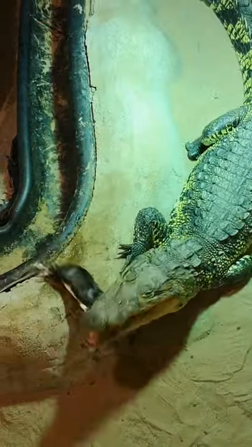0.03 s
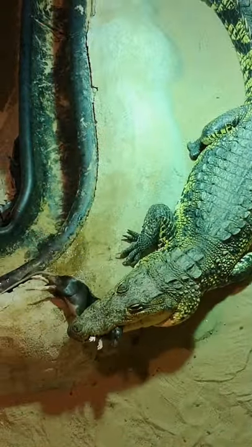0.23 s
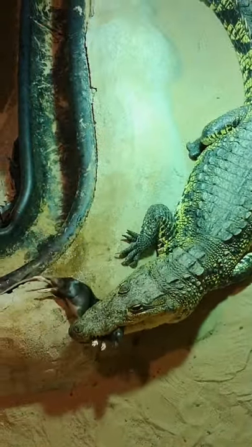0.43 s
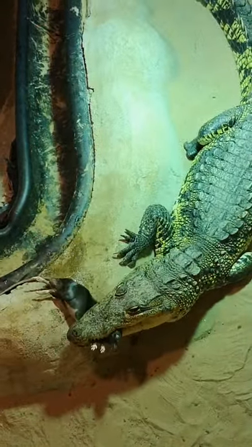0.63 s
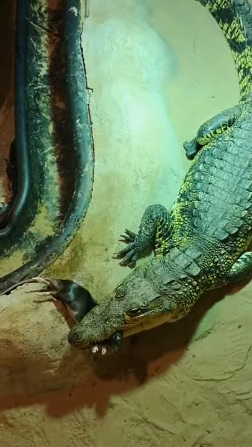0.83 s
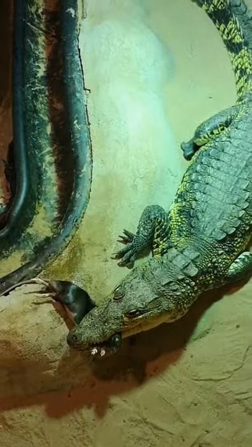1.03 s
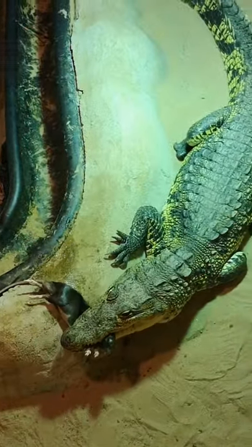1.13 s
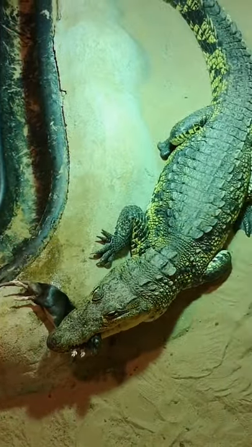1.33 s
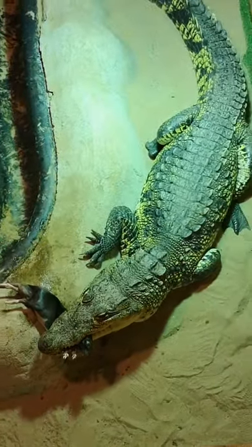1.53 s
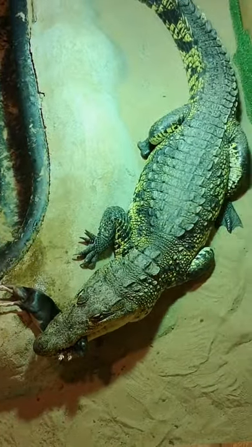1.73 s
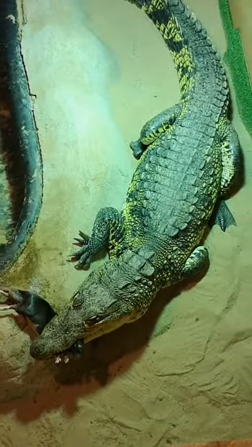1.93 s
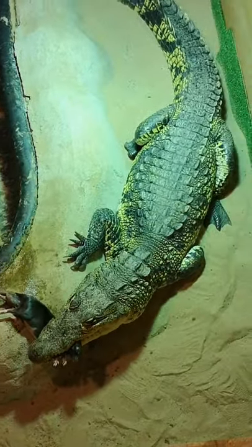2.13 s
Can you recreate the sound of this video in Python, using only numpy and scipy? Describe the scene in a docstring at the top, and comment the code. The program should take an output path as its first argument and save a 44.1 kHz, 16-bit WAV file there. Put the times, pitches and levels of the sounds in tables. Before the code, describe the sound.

A crocodile's jaws snap shut with one bright crunch, followed by two hollow thumps.

```python
"""Crocodile snapping in its enclosure

Stereo microphone, hard walls close by. To the left a crocodile lunges, scuffing sand, and its jaws shut
on a small animal: one bright crunch of grit and bone. Head and body land twice and set the hollow floor
ringing; it settles with faint rustles. Ventilation hisses, rumbles and hums underneath."""
import sys
import numpy as np
from scipy import signal
from scipy.fft import rfft, irfft
from scipy.io import wavfile

SR = 44100
rng = np.random.default_rng(int(sys.argv[2]) if len(sys.argv) > 2 else 0)


def materialize(psi):
    """Save the field psi as 16-bit PCM at rate SR to the path in sys.argv[1].

    A 1-D psi becomes a single channel; in a 2-D psi each row is a channel.
    """
    bounded = np.clip(np.atleast_2d(psi).T, -1, 1)
    quanta = np.round(bounded * 32767).astype(np.int16)
    wavfile.write(sys.argv[1], SR, quanta)


N = 97020
T = np.arange(N) / SR

# Ventilation hiss and rumble spectra: freq_hz, gain_db
HISS_SPECTRUM = [(120, -24), (200, -2.5), (304, -8.5), (462, -8), (554, -15), (1260, -11), (1740, -7.5),
                 (2650, -8), (4100, -17), (5490, -16), (7350, -20.5), (8350, -23.5), (10200, -23),
                 (15500, -26.5)]
RUMBLE_SPECTRUM = [(10, 8), (30, 1.5), (55, 2), (100, 1.5), (150, -9.5), (220, -15), (400, -26),
                   (1000, -87.5)]
# Fan hum: time_s, level_db
HUM_LEVELS = [(0, -75.5), (1.1, -78), (1.4, -71.5), (1.65, -73.5), (1.88, -72.5), (1.95, -60), (2.04, -69),
              (2.15, -63)]
# Decay of the enclosure: freq_hz, t60_s
ROOM_DECAY = [(200, 0.19), (1500, 0.24), (4000, 0.31), (9000, 0.21), (15000, 0.18)]
# Leftward lean at the microphone: freq_hz, left_minus_right_db
LEFT_LEAN = [(100, 4), (400, 1.5), (700, 7), (1290, 6.5), (2380, 1), (4400, 2.5), (6000, 3), (8500, 9.5),
             (10000, 9.5), (11500, 3.5), (15000, 3)]

# Strokes of movement: start_s, rise_s, hold_s, fall_db_per_s, level_db
RUSTLE_STROKES = [(1.02, 0.011, 0.016, 120, -86), (1.345, 0.035, 0.018, 207, -78.5),
                  (1.455, 0.01, 0.011, 229, -78), (1.615, 0.029, .005, 300, -79),
                  (1.80, 0.012, 0.022, 146, -83.5)]  # the animal settling
SCUFF_STROKES = [(-.02, 0.02, .06, 91, -71.5), (.062, 0.019, .035, 120, -59),
                 (.12, 0.019, 0.0047, 154, -54.5)]  # feet and scales on sand
DRAG_STROKES = [(.33, 0.026, 0.015, 61, -71), (.48, 0.017, 0.033, 12.5, -69.5),
                (.532, 0.0027, 0.029, 151, -60.5)]  # belly on sand
LANDING_STROKES = [(.312, 0.0039, 0.0063, 308, -58), (.533, 0.0067, 0.01, 271, -58)]  # sand crushed under each landing
SHOVE_STROKES = [(.305, 0.014, 0.02, 196, -41.5), (.528, 0.004, 0.036, 149, -42)]  # body pushing over the floor
BOOM_STROKES = [(.36, 0.0078, 0.026, 104, -46.5), (.62, 0.043, 0.11, 122, -59),
                (.8, 0.026, 0.12, 105, -60.5)]  # low boom lingering in the enclosure
# Spectra of those strokes, the ticks and the crunch: freq_hz, gain_db
RUSTLE_SPECTRUM = [(1000, -23), (3500, -8), (5500, 9), (7500, 7), (10000, 3.5), (12000, -12),
                   (15000, -25.5)]
SCUFF_SPECTRUM = [(150, 6.5), (400, -2.5), (620, -13), (850, -18), (1050, -7.5), (1300, -10), (1750, -3),
                  (2300, -2.5), (3000, -12.5), (5500, -6), (9200, -10), (12000, -18.5), (15000, -26)]
DRAG_SPECTRUM = [(200, -8), (500, 10), (800, -3), (1100, 1), (1650, 1.5), (2500, -7.5), (4000, -14.5),
                 (8000, -22.5), (15000, -42)]
LANDING_SPECTRUM = [(200, -18), (420, -7), (600, 7), (800, 4.5), (1150, -9.5), (2300, -17), (4000, -33),
                    (12000, -56)]
SHOVE_SPECTRUM = [(20, -6), (45, 2), (100, 7.5), (200, -7), (255, -22), (330, -7), (450, -16), (650, -45),
                  (1000, -53), (3000, -97)]
BOOM_SPECTRUM = [(15, -16), (45, -4), (60, -5.5), (75, 4.5), (88, 3), (110, -22), (200, -64.5)]
TICK_SPECTRUM = [(500, -24), (2500, -24), (3600, 4), (4600, 7), (6000, -5), (9000, -5), (15000, -6.5)]
CRUNCH_SPECTRUM = [(150, -46), (450, -18), (640, -18), (780, -1.5), (1030, 2.5), (1150, -14), (1350, 1.5),
                   (1580, -9), (1800, -2.5), (2450, 2), (3200, -4.5), (3650, -4), (3880, -9), (4700, -3),
                   (7000, -5.5), (9500, -6), (10900, -10.5), (11600, -13.5), (15000, -27)]

# Hide and teeth squeaking: start_s, pitch_hz, length_s, level_db, relative_width
HIDE_SQUEAKS = [(0.085, 1680, 0.02, -61.5, 0.094), (0.2132, 2450, 0.0058, -42, 0.078),
                (0.252, 1040, 0.034, -51.5, 0.035), (0.275, 1010, 0.018, -51.5, 0.047),
                (0.304, 1870, 0.0103, -50.5, 0.11), (.622, 1470, 0.019, -63.5, 0.086),
                (.68, 1200, 0.036, -70.5, 0.036), (1.13, 2460, .025, -78, .15),
                (1.335, 1950, 0.031, -75.5, .1)]
# Blows on the floor, harder with a higher corner: start_s, level_db, corner_hz
FLOOR_BLOWS = [(.305, -42, 477), (0.3202, -37.5, 290), (0.3382, -38.5, 232), (.372, -41.5, 163),
               (0.472, -43, 63), (.532, -42, 655), (0.5572, -37, 355), (.569, -42, 304), (.603, -44.5, 196),
               (0.736, -52.5, 100)]
# Resonances: pitch_hz, level_db, t60_s
HOLLOW_FLOOR_MODES = [(28.18, -4.5, 0.93), (49.5, -9, 0.64), (86.1, -12, 0.42), (109.8, -1, 0.26),
                      (135.6, 2.5, 0.21), (171.4, -2, 0.2), (201.9, -2, 0.23), (302.3, -8.5, 0.31),
                      (330.2, -4.5, 0.13), (408, -14, 0.092), (422, -8, 0.079)]
JAW_AND_WALL_MODES = [(752, -10, .13), (854, -11, .13), (900, -7, .15), (947, -4, .2), (1018, -3, .24),
                      (1049, -2, .26), (1312, -5, .14), (1354, -2, .15)]
# Single cracks: start_s, level_db, tilt_db_per_octave, decay_s
DRY_TICKS = [(.5608, -35, 3, 0.0014), (1.619, -56, -5, 0.0013), (1.652, -52.5, -11, .0015)]
BONE_CRACKS = [(0.1209, -33.5, -3, .003), (0.1264, -31.5, -9, 0.0022), (0.1444, -25, 2.5, 0.0021),
               (0.2142, -24, -2.5, 0.0016), (0.2199, -21, 1.5, 0.0012), (0.2276, -13, -2.5, 0.004),
               (0.2294, -18, -7, 0.0022), (0.2308, -17.5, 2, 0.0018), (0.2474, -20.5, -4.5, 0.0004),
               (0.2581, -21, -1, 0.00051), (0.262, -20, 0.5, 0.001), (.3095, -28.5, 0.5, .002)]  # grit and bone


def amp(db):
    """Decibels to gain."""
    return 10 ** (np.asarray(db) / 20)


def unit(x):
    """Scales to rms 1."""
    return x / np.sqrt(np.mean(x ** 2) + 1e-20)


def read(points, hz):
    """Reads a table on a log-frequency axis."""
    freq_hz, value = np.transpose(points)
    return np.interp(np.log(hz + 1), np.log(np.maximum(freq_hz, 0) + 1), value)


def colour(x, spectrum, share=1):
    """Minimum-phase filter; share scales the spectrum's decibels."""
    size = 2 ** 17
    gain_db = share * np.maximum(read(spectrum, abs(np.fft.fftfreq(size, 1 / SR))), -100)
    response = np.exp(np.conj(signal.hilbert(np.log(amp(gain_db)))))[:size // 2 + 1]
    return irfft(rfft(x, size) * response, size)[..., :N]


def add(mix, start_s, sound):
    """Mixes a sound in at a time."""
    part = mix[..., max(round(start_s * SR), 0):][..., :sound.shape[-1]]
    part += sound[..., :part.shape[-1]]


def grains(per_s, spread_db):
    """Random tiny clicks of uneven size."""
    clicks = rng.choice([-1., 1.], N) * (rng.random(N) < per_s / SR)
    return unit(clicks * amp(spread_db * np.minimum(rng.exponential(1, N), 4)))


def strokes(noise, spectrum, rows):
    """Coloured noise under envelopes that rise, hold and fall; overlaps add in power."""
    power = np.zeros(N)
    for start_s, rise_s, hold_s, fall_db_per_s, level_db in rows:
        attack = np.clip((T - start_s) / rise_s, 0, 1)
        falling_s = np.maximum(T - start_s - rise_s - hold_s, 0)
        power += (attack * amp(level_db - fall_db_per_s * falling_s)) ** 2
    return unit(colour(noise, spectrum)) * np.sqrt(power)


def from_right(x, lag_samples=27):
    """A sound that reaches the right side of the microphone first."""
    return np.array([np.pad(x, (lag_samples, 0))[:N], x])


def from_left(draw, lag_samples=13, own_share=0.57):
    """Stereo noise: a shared part arrives on the left first, the rest is each side's own."""
    shared = draw()
    delayed_pair = np.array([shared, np.roll(shared, lag_samples)])
    return np.sqrt(1 - own_share) * delayed_pair + np.sqrt(own_share) * np.array([draw(), draw()])


def ventilation(hiss_db=-76, rumble_db=-64.5, hum_hz=93.4, waver_hz=2.06):
    """Room tone: steady hiss, low rumble and a wavering fan hum."""
    hiss = 0.13 * from_right(rng.standard_normal(N)) + rng.standard_normal((2, N))
    hiss = colour(hiss, HISS_SPECTRUM)
    hiss /= np.std(hiss.mean(0))
    rumble = from_right(rng.standard_normal(N)) + amp(-13) * rng.standard_normal((2, N))
    rumble = unit(colour(rumble, RUMBLE_SPECTRUM))
    waver = unit(colour(rng.standard_normal(N), [(5, -2.5), (15, -21), (60, -90.5)]))
    phase = 2 * np.pi * np.cumsum(hum_hz + waver_hz * waver) / SR
    hum = np.sqrt(2) * np.sin(phase) * amp(np.interp(T, *np.transpose(HUM_LEVELS)))
    return amp(hiss_db) * hiss + amp(rumble_db) * rumble + from_right(hum)


def reflections(decay, delay_s):
    """Sparse wall echoes, different on each side, each band dying at its own speed."""
    shape = (2, SR // 2)
    taps = rng.choice([-1., 1.], shape) * (rng.random(shape) < .12) * (T[:SR // 2] > delay_s)
    hz, t, bands = signal.stft(taps, SR, nperseg=128)
    tail = signal.istft(bands * amp(-60 * t / read(decay, hz)[:, None]), SR, nperseg=128)[1]
    return tail / np.linalg.norm(tail, axis=1, keepdims=True)


def enclosure(x, walls_db=-7, walls_t60_s=0.043, tail_db=-15.5):
    """Direct sound, close walls and a short room tail, leaning left at the microphone."""
    walls = amp(walls_db) * reflections([(1000, walls_t60_s)], delay_s=0.0022)
    tail = amp(tail_db) * reflections(ROOM_DECAY, delay_s=0.019)
    echoes = signal.fftconvolve(x, walls + tail, axes=1)[:, :N]
    left, right = (x + echoes) / np.hypot(1, amp(walls_db))
    return np.array([colour(left, LEFT_LEAN, share=.5), colour(right, LEFT_LEAN, share=-.5)])


def scuffs_and_rustles():
    """Feet and scales shift sand in the lunge; thin, uneven grains rustle as the animal settles."""
    scuffs = strokes(from_left(lambda: grains(per_s=3000, spread_db=2.5)), SCUFF_SPECTRUM, SCUFF_STROKES)
    uneven_grains = from_left(lambda: grains(per_s=2500, spread_db=10))
    return scuffs + strokes(uneven_grains, RUSTLE_SPECTRUM, RUSTLE_STROKES)


def squeaks():
    """Hide and teeth slip: brief swells of noise, each in one narrow resonance."""
    out, hz = np.zeros((2, N)), np.fft.rfftfreq(4096, 1 / SR)
    for start_s, pitch_hz, length_s, level_db, width in HIDE_SQUEAKS:
        noise = from_left(lambda: rng.standard_normal(4096))
        resonance = 1 / (1 + ((hz / pitch_hz - 1) / width) ** 2)
        slips = irfft(rfft(noise) * resonance)[:, :int(length_s * SR)]
        swell = np.sin(np.linspace(0, np.pi, slips.shape[1]))
        add(out, start_s, amp(level_db) * unit(slips * swell))
    return out


def sand_under_belly():
    """Sand grains dragged by the belly and crushed at each landing."""
    drag = strokes(grains(per_s=1200, spread_db=0.5), DRAG_SPECTRUM, DRAG_STROKES)
    return drag + strokes(grains(per_s=1700, spread_db=2.5), LANDING_SPECTRUM, LANDING_STROKES)


def floor_thumps(rise_s=0.002):
    """Heavy blows ring the hollow floor; the body shoves over it and a low boom lingers."""
    thumps, t = np.zeros(N), T[:SR]
    for start_s, level_db, corner_hz in FLOOR_BLOWS:
        ring = np.zeros(len(t))
        for k, (hz, mode_db, t60_s) in enumerate(HOLLOW_FLOOR_MODES):
            drive = amp(level_db) / np.hypot(1, (hz / corner_hz) ** 2)  # soft blows favour low modes
            phase = np.pi * k ** 2 / len(HOLLOW_FLOOR_MODES)  # the modes peak at different times
            ring += drive * amp(mode_db - 60 * t / t60_s) * np.sin(2 * np.pi * hz * t + phase)
        add(thumps, start_s, ring * np.minimum(t / rise_s, 1))
    shove = strokes(grains(per_s=1800, spread_db=2.5), SHOVE_SPECTRUM, SHOVE_STROKES)
    boom = strokes(rng.standard_normal(N), BOOM_SPECTRUM, BOOM_STROKES)
    return thumps + shove + boom


def cracks(rows, spectrum, lead_samples=32):
    """Each crack is a noise burst dying within milliseconds, tilted duller or brighter."""
    out, t, hz = np.zeros((2, N)), T[:1024], np.fft.rfftfreq(1024, 1 / SR)
    octaves = np.log2(np.maximum(hz, 700) / 3000)
    for start_s, level_db, tilt, decay_s in rows:
        burst = from_left(lambda: rng.choice([-1., 1.], len(t)) * np.exp(-t / decay_s))
        burst = np.roll(burst, lead_samples, axis=1)  # room for the filter's pre-ring
        burst = irfft(rfft(burst) * amp(read(spectrum, hz) + tilt * octaves))
        add(out, start_s - lead_samples / SR, amp(level_db) * unit(burst) / np.sqrt(len(t)))
    return out


def bite(start_s=0.2121, rise_s=.011, hold_s=0.041, fall_db_per_s=299, level_db=-40.5, ring_db=-40.5):
    """The jaws crush grit and bone; duller cracks ring the jaws and close walls more strongly."""
    closing = [(start_s, rise_s, hold_s, fall_db_per_s, level_db)]
    crunch = strokes(from_left(lambda: grains(per_s=4500, spread_db=2)), CRUNCH_SPECTRUM, closing)
    crunch += cracks(BONE_CRACKS, CRUNCH_SPECTRUM)
    t = T[:SR // 3]
    for crack_s, crack_db, tilt, _ in BONE_CRACKS:
        ring = sum(amp(mode_db - 60 * t / t60_s) * np.sin(2 * np.pi * (hz * t + rng.random((2, 1))))
                   for hz, mode_db, t60_s in JAW_AND_WALL_MODES)
        add(crunch, crack_s, amp(crack_db + ring_db - tilt) * ring)
    return crunch


def scene(body_room_db=-7.5):
    """Lunge and bite to the left, the body landing to the right, ventilation behind."""
    sand = scuffs_and_rustles()
    body = floor_thumps() + sand_under_belly()
    room = amp(body_room_db) * reflections(ROOM_DECAY, delay_s=0.0032)
    body_echoes = signal.fftconvolve(body[None], room, axes=1)[:, :N]
    strike = enclosure(bite() + sand + squeaks())
    ticks = cracks(DRY_TICKS, TICK_SPECTRUM)
    return strike + from_right(body) + body_echoes + ticks + ventilation()


def record(dry, cutoff_hz=15700):
    """The recorder's band limit."""
    lowpass = signal.firwin(511, cutoff_hz, window=("kaiser", 9), fs=SR)
    return signal.oaconvolve(dry, lowpass[None], "same", axes=1)


dry = scene()
out = record(dry)
materialize(out)
```